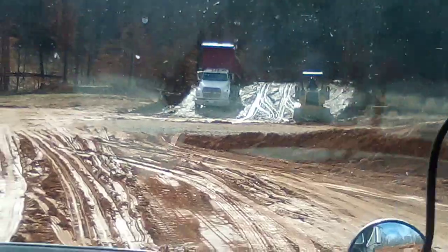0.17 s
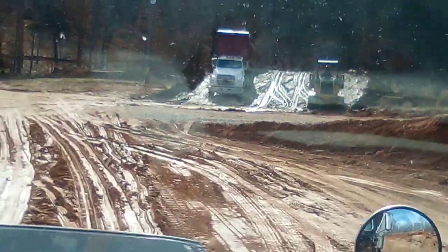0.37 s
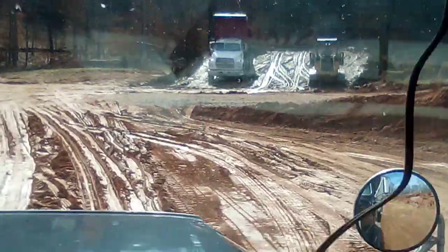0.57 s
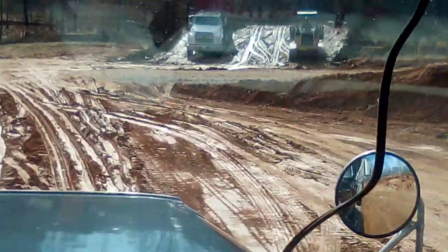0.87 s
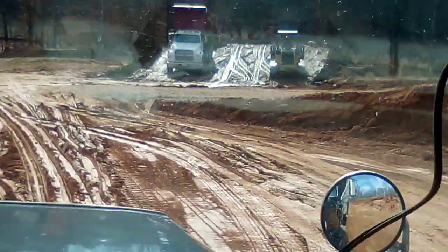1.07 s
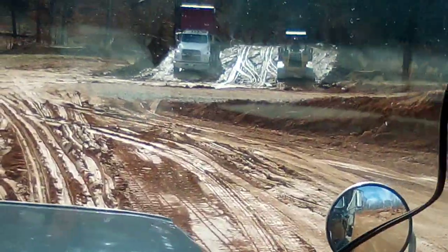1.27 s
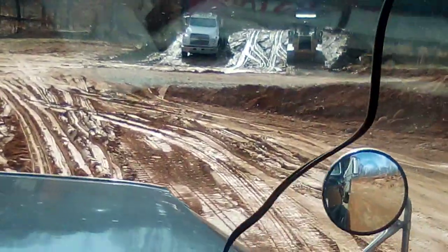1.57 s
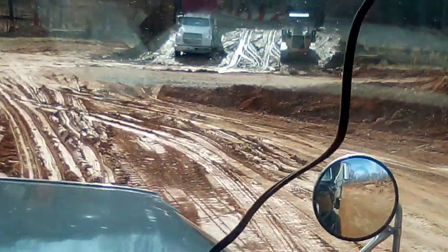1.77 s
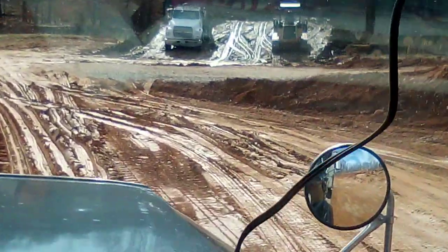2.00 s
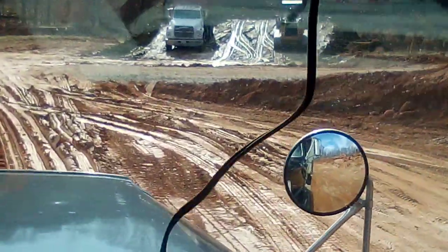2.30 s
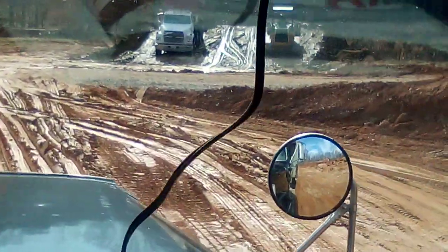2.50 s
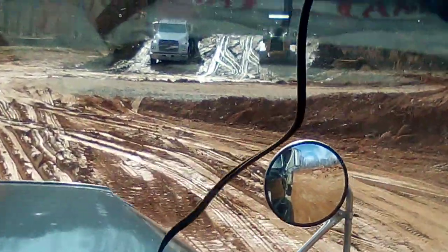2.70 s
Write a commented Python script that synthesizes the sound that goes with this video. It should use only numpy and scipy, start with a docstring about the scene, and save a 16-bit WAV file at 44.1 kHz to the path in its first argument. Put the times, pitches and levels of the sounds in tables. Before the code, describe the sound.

A heavy truck's diesel engine drones steadily inside the cab, slowly falling in pitch. Early on, trim squeaks, fittings click and the body knocks dully; later only sparse knocks remain. Close single microphone, slightly dull treble.

```python
"""Inside the cab of a heavy truck, heard from one place by a single microphone that dulls the high treble.
A six-cylinder diesel eases down, a sum of sine orders sliding through the cab's resonances until the
firing note booms. Combustion clatter, body rumble and hiss are shaped noise.
Loose fittings click (ringing noise bursts), the trim squeaks (bending tones), and the body knocks
(muffled noise) and booms (swelling sines) as the cab rocks."""
import sys
import numpy as np
from scipy import signal
from scipy.fft import rfft, irfft
from scipy.io import wavfile
from scipy.ndimage import map_coordinates

SR = 44100
rng = np.random.default_rng(int(sys.argv[2]) if len(sys.argv) > 2 else 0)


def store_pcm(level_fs):
    """Save levels as 16-bit WAV."""
    pcm = np.round(np.clip(level_fs, -1, 1) * 32767).astype(np.int16)
    wavfile.write(sys.argv[1], SR, np.atleast_2d(pcm).T)


N = 125685

# Crankshaft speed before its slight wander: (time [s], speed [turns/s])
CRANK_SPEED = [(0, 41.5), (.25, 41.4), (.5, 42.1), (.75, 41.1), (1.1, 39.6), (1.5, 38.5), (1.95, 37.7),
               (2.24, 35.5), (2.5, 35.6), (2.85, 34.9)]
# Engine orders before cab and load; 3 is the firing note: (multiple of crankshaft speed, level [dB])
ENGINE_ORDERS = [(1, -30.5), (1.5, -38), (2, -27), (2.5, -25.5), (3, -18.3), (3.5, -28.5), (4, -25),
                 (4.5, -44), (5, -46), (5.5, -42), (6, -44), (7, -47), (8, -45)]
# How the cab answers the engine orders: (frequency [Hz], gain [dB])
CAB_RESPONSE = [(34, -6), (38, 3), (42, -8), (70, -10), (76, -4), (80, 0), (84, -2), (90, -19.5), (98, -4),
                (102, -1), (107, 0), (111, -3), (114, -6), (119, -10.5), (125, -11), (143, -11), (150, -11),
                (153, -2), (156, 1.5), (159, 2), (163, -15), (220, -3.5)]
# Load on the engine, heard in the orders only: (time [s], gain [dB])
ENGINE_LOAD = [(0, -1), (.45, -2.5), (.85, -2), (1.15, -3), (1.5, -3.5), (1.95, -1.5), (2.3, -2.5),
               (2.85, -2)]
SPEED_WANDER, ORDER_FLICKER_DB = .002, .7  # wander as a share of the speed

# Spectral shape of the body rumble: (frequency [Hz], relative level [dB])
RUMBLE_SHAPE = [(20, -37.5), (33, -8), (48, -10), (63, -8), (88, -8), (103, 7), (117, -7), (140, -2),
                (163, -2), (190, -10), (250, -24), (500, -61.5)]
# Rumble over time: (time [s], level [dB])
RUMBLE_LEVEL = [(0, -28.5), (.9, -32), (1.4, -35), (1.9, -32.5), (2.85, -33.5)]

# Spectral shape of the combustion clatter: (frequency [Hz], relative level [dB])
CLATTER_SHAPE = [(120, -9.5), (210, -1.5), (300, 1), (390, -0.5), (520, -1), (670, -2), (850, -4),
                 (1100, -6.5), (1700, -15.5), (2600, -21), (4200, -24), (8000, -43.5), (16000, -60.5)]
# Clatter over time, before its flutter: (time [s], level [dB])
CLATTER_LEVEL = [(0, -35.5), (.7, -35), (.95, -32.5), (1.4, -36.5), (1.75, -35.5), (2.2, -36), (2.85, -36)]
# Ringing panels: (frequency [Hz], width [Hz], level [dB])
PANEL_RESONANCES = [(297.6, 43, -47), (570.4, 22, -49), (667.7, 14, -46), (993, 23, -52.5),
                    (2070, 33, -63.5), (2592, 150, -56.5)]
CLATTER_PULSING, CLATTER_REPEAT = 0.14, 0.089  # pulse depth; share of power repeating every two turns

# Clicks of loose fittings: (time [s], level [dB], brightest frequency [Hz], decay [s],
# crack relative to the ring [dB])
FITTING_CLICKS = [(0.2058, -28, 3200, 0.0092, -14), (0.290, -32.5, 2540, 0.0095, -5),
                  (0.5541, -27, 4020, 0.0081, -8), (0.5698, -27.5, 4440, 0.0057, 4),
                  (0.6117, -26, 5700, 0.0062, 6.5), (0.7333, -40.5, 4840, 0.018, 1),
                  (0.7837, -28, 4130, 0.0059, -2.5), (0.7855, -25.5, 2600, 0.0085, -16),
                  (0.911, -35.5, 5160, 0.0067, -8), (1.4142, -37, 3470, 0.0084, -7),
                  (1.4214, -35, 5900, 0.0073, -2.5), (1.4397, -38, 5450, 0.008, -6),
                  (2.0745, -39, 4100, 0.0098, -8), (2.379, -42, 5100, 0.015, -21),
                  (2.454, -43, 2950, 0.0069, -6)]
# Resonances of the fittings: (frequency [Hz], width [Hz], gain [dB])
FITTING_RESONANCES = [(1200, 810, -1), (1920, 1100, -4.5), (2590, 350, -0.5), (3380, 1400, -13),
                      (4530, 760, -7), (5540, 660, -0.5), (5800, 480, -16.5)]
# Spectral shape of the sharp crack in each click: (frequency [Hz], relative level [dB])
CRACK_SHAPE = [(3000, -7.5), (7000, -8.5), (12000, 3), (16000, -12.5)]
CLICK_RISE_S, CLICK_SPREAD_OCT = 0.00085, .85
SNAP_DB, SNAP_RISE_S, SNAP_DECAY_S = 8, .00015, .0012  # first contact, relative to the click
CAB_TAIL_DB, CAB_TAIL_S = -14.5, 0.023  # tail in the cab, relative to the click

# Squeaks of the trim: (time [s], length [s], pitch [Hz], level [dB], roughness [0-1],
# octave relative to the fundamental [dB])
TRIM_SQUEAKS = [(0.18, 0.03, 6820, -40, 0.5, -31), (0.249, 0.042, 3380, -31, 0.75, -13),
                (.26, 0.018, 6300, -29, .3, -25), (0.256, 0.106, 3280, -38, .05, -32),
                (0.361, 0.043, 6870, -32.5, .2, -4), (0.405, 0.034, 6850, -39, 0.5, -34),
                (0.433, 0.038, 3480, -35, .75, -17), (1.175, 0.023, 6850, -34, 0, -7),
                (1.194, 0.038, 6920, -38, 0.2, -19), (1.233, 0.036, 3280, -29.5, .4, -13),
                (1.25, 0.098, 3280, -40.5, 0.05, -36)]
SQUEAK_EDGE_S = 0.017  # rise and fall
SQUEAK_JITTER, SQUEAK_SAG, SQUEAK_FLUTTER_DB = .03, .04, 3  # at roughness 1; first two as shares of pitch
SQUEAK_THIRD_DB = -5  # third harmonic relative to the octave
RUB_DB, RUB_HZ, RUB_WIDTH_HZ = -5.5, 6360, 820  # dry scratch, at roughness 1
SQUEAK_BLUR_DB, SQUEAK_BLUR_HZ, SQUEAK_BLUR_ABOVE_HZ = -3, 500, 150  # noise: level, width, offset above pitch

# Dull knocks of the body: (time [s], level [dB], frequency [Hz])
BODY_KNOCKS = [(0.071, -29.5, 500), (.175, -25, 580), (0.285, -26, 696), (.385, -34, 500),
               (0.471, -26, 474), (0.671, -30.5, 357), (.89, -25.5, 553), (0.927, -25, 555),
               (0.969, -30, 600), (1.073, -26.5, 514), (1.187, -29.5, 640), (1.485, -27.5, 450),
               (2.02, -27.5, 557), (2.371, -29, 450)]
KNOCK_WIDTH_HZ, KNOCK_TOP_HZ = 314, 1850
KNOCK_RISE_S, KNOCK_DECAY_S = .012, 0.016

# Low booms as the cab rocks: (time of crest [s], length [s], frequency [Hz], level [dB])
CAB_BOOMS = [(.03, .15, 166, -27.5), (.35, .16, 143, -33), (.72, 0.13, 154, -33), (1.67, 0.16, 162, -38),
             (2.32, 0.24, 62.3, -33)]

# Spectral shape of the hiss: (frequency [Hz], relative level [dB])
HISS_SHAPE = [(800, -8), (1500, 1), (2100, 6), (2650, 6), (3200, 3), (4400, 1.5), (6300, 1.5), (8000, -17),
              (12000, -13), (16000, -38.5)]
# Hiss over time, before its flutter: (time [s], level [dB])
HISS_LEVEL = [(0, -44.5), (.25, -41.5), (.7, -43), (1.0, -43), (1.45, -44.5), (1.9, -45), (2.3, -48),
              (2.85, -46)]

# Microphone treble: (frequency [Hz], gain [dB])
MIC_TREBLE = [(6700, -0.5), (7200, -1.5), (8000, -10.5), (10000, -17.5), (13800, -25.5), (15200, -4.5)]
TOP_HZ = 16100  # upper limit of the recorder


def undb(db):
    """Decibels to gain."""
    return 10 ** (np.asarray(db) / 20)


def unit(x):
    """Scale to rms 1."""
    return x / np.sqrt(np.mean(x ** 2))


def curve(rows):
    """Interpolate (time, value) rows to every sample."""
    return np.interp(np.arange(N) / SR, *np.array(rows).T)


def response(hz, points):
    """Gain of a (frequency, dB) curve, interpolated along log frequency."""
    f, db = np.array(points).T
    return undb(np.interp(np.log(np.maximum(hz, 1)), np.log(f), db))


def bins():
    """Frequencies of the spectrum in Hz."""
    return np.fft.rfftfreq(N, 1 / SR)


def colour(x, points):
    """Filter by a (frequency, dB) curve."""
    return irfft(rfft(x) * response(bins(), points), N)


def resonate(x, hz, width_hz):
    """Two-pole resonance, gain 1 at its centre."""
    b, a = signal.iirpeak(min(hz, SR / 2 - 1), hz / width_hz, fs=SR)
    return signal.lfilter(b, a, x)


def noise():
    """White noise."""
    return rng.standard_normal(N)


def walk(rate_hz):
    """Smooth random motion with rms 1, mostly slower than the given rate."""
    smoothing = np.exp(-(bins() / rate_hz) ** 2) * (bins() > 0)
    return unit(irfft(rfft(noise()) * smoothing, N))


def decay(start, rise_s, decay_s):
    """A quick rise and exponential fall."""
    age = np.maximum(np.arange(N) / SR - start, 0)
    return (1 - np.exp(-age / rise_s)) * np.exp(-age / decay_s)


def engine(speed, turns):
    """Each order follows the crankshaft and swells where it meets a cab resonance."""
    orders = 0
    for multiple, db in ENGINE_ORDERS:
        tone = np.sqrt(2) * np.sin(2 * np.pi * (multiple * turns + rng.random()))
        level = undb(db + ORDER_FLICKER_DB * walk(6))
        orders = orders + tone * level * response(multiple * speed, CAB_RESPONSE)
    return orders * undb(curve(ENGINE_LOAD))


def clatter(turns):
    """Combustion noise pulses three times a turn and partly repeats every two turns."""
    size = 2048  # points in one two-turn cycle
    position = turns / 2 % 1 * size
    cycle = unit(map_coordinates(rng.standard_normal(size), [position], mode="grid-wrap"))
    mix = np.sqrt(CLATTER_REPEAT) * cycle + np.sqrt(1 - CLATTER_REPEAT) * noise()
    firing = np.cos(6 * np.pi * turns)
    pulsed = mix * (1 + CLATTER_PULSING * firing)
    return unit(colour(pulsed, CLATTER_SHAPE)) * undb(curve(CLATTER_LEVEL) + walk(42))


def panels():
    """Panels ring steadily: noise passes a narrow resonance, then a broad one at the same pitch."""
    out = 0
    for hz, width_hz, db in PANEL_RESONANCES:
        ring = resonate(resonate(noise(), hz, width_hz), hz, hz / 2)
        out = out + undb(db) * unit(ring)
    return out


def rattles():
    """Hard little clicks: a snap at first contact, then loose fittings ring and die away in the cab."""
    out, t = 0, np.arange(N) / SR
    for start, db, hz, decay_s, crack_db in FITTING_CLICKS:
        strike = noise()
        ring = sum(undb(gain_db) * resonate(strike, f, width) for f, width, gain_db in FITTING_RESONANCES)
        # favour the ring near the click's brightest frequency
        focus = 1 / (1 + (np.log2((bins() + 1) / hz) / CLICK_SPREAD_OCT) ** 2)
        focused_ring = unit(irfft(rfft(ring) * focus, N))
        crack = undb(crack_db) * unit(colour(noise(), CRACK_SHAPE))
        tail = undb(CAB_TAIL_DB) * decay(start, CLICK_RISE_S, CAB_TAIL_S)
        fall = decay(start, CLICK_RISE_S, decay_s) + tail
        contact = np.sin(2 * np.pi * hz * (t - start))
        snap = undb(SNAP_DB) * contact * decay(start, SNAP_RISE_S, SNAP_DECAY_S)
        out = out + undb(db) * (snap + (focused_ring + crack) * fall)
    return out


def squeaks():
    """Stick-slip tones: rough ones jitter, sag and scratch, smooth ones sing."""
    out, t = 0, np.arange(N) / SR
    rub_noise = resonate(resonate(noise(), RUB_HZ, RUB_WIDTH_HZ), RUB_HZ, 4 * RUB_WIDTH_HZ)
    rub = undb(RUB_DB) * unit(rub_noise)
    for start, length, hz, db, rough, octave_db in TRIM_SQUEAKS:
        u = (t - start) / length  # 0 to 1 through the squeak
        swell = np.clip(np.minimum(u, 1 - u) * length / SQUEAK_EDGE_S, 0, 1)
        bend = SQUEAK_JITTER * walk(1100) - SQUEAK_SAG * np.clip(2 * u - 1, -1, 1)
        phase = 2 * np.pi * np.cumsum(hz * (1 + rough * bend)) / SR
        overtones = np.sin(2 * phase) + undb(SQUEAK_THIRD_DB) * np.sin(3 * phase)
        tone = np.sin(phase) + undb(octave_db) * overtones
        blur_hz = hz + SQUEAK_BLUR_ABOVE_HZ
        blur = resonate(resonate(noise(), blur_hz, SQUEAK_BLUR_HZ), blur_hz, 2 * SQUEAK_BLUR_HZ)
        scratch = rub + undb(SQUEAK_BLUR_DB) * unit(blur)
        level = undb(db + SQUEAK_FLUTTER_DB * rough * walk(280))
        out = out + (np.sqrt(2) * tone + rough * scratch) * swell * level
    return out


def knocks():
    """Soft, muffled blows in the body: resonant noise, low-passed, with a soft rise and short fall."""
    out = 0
    b, a = signal.butter(2, KNOCK_TOP_HZ, fs=SR)
    rise_makeup = 1 + KNOCK_RISE_S / KNOCK_DECAY_S  # makes up for level lost to the slow rise
    for start, db, hz in BODY_KNOCKS:
        thud = unit(signal.lfilter(b, a, resonate(noise(), hz, KNOCK_WIDTH_HZ)))
        out = out + undb(db) * thud * rise_makeup * decay(start, KNOCK_RISE_S, KNOCK_DECAY_S)
    return out


def booms():
    """Low resonances of the cab swell briefly: sines under bell-shaped envelopes."""
    out, t = 0, np.arange(N) / SR
    for crest, length, hz, db in CAB_BOOMS:
        swell = np.exp(-(2 * (t - crest) / length) ** 2)
        tone = np.sqrt(2) * np.sin(2 * np.pi * (hz * t + rng.random()))
        out = out + undb(db) * swell * tone
    return out


def rumble():
    """Low noise of the body, its level drifting."""
    return undb(curve(RUMBLE_LEVEL)) * unit(colour(noise(), RUMBLE_SHAPE))


def hiss():
    """Treble noise made grainy by fast level flutter, mostly fading over time."""
    grainy = noise() * undb(2.0 * walk(210))
    return unit(colour(grainy, HISS_SHAPE)) * undb(curve(HISS_LEVEL) + 1.3 * walk(25))


def scene():
    """Engine and cab noises at one place in the cab."""
    speed = curve(CRANK_SPEED) * (1 + SPEED_WANDER * walk(10.0))
    turns = np.cumsum(speed) / SR
    steady = engine(speed, turns) + rumble() + clatter(turns) + panels() + hiss()
    rocking = booms() + knocks() + rattles() + squeaks()
    return (steady + rocking)[None]


def record(dry):
    """The microphone dulls the treble; the recorder cuts steeply above its upper limit."""
    top_cut = signal.ellip(8, .2, 70, TOP_HZ, fs=SR, output="sos")
    return signal.sosfilt(top_cut, colour(dry, MIC_TREBLE))


dry = scene()
out = record(dry)
store_pcm(out)
```